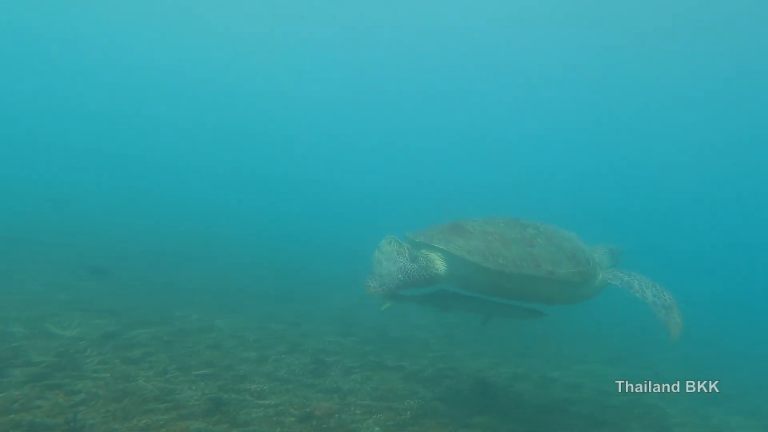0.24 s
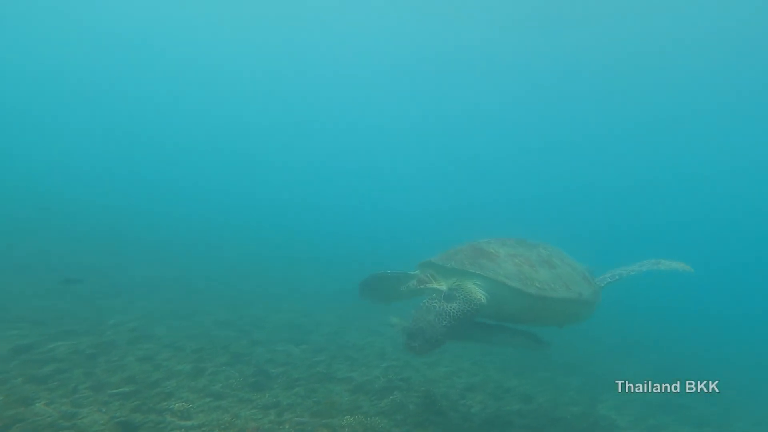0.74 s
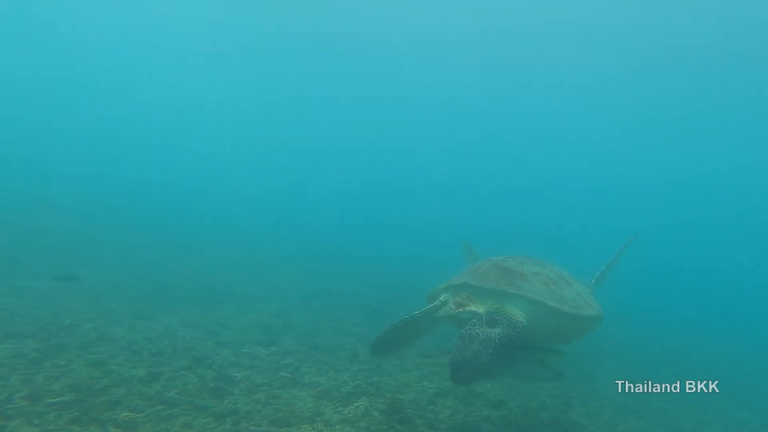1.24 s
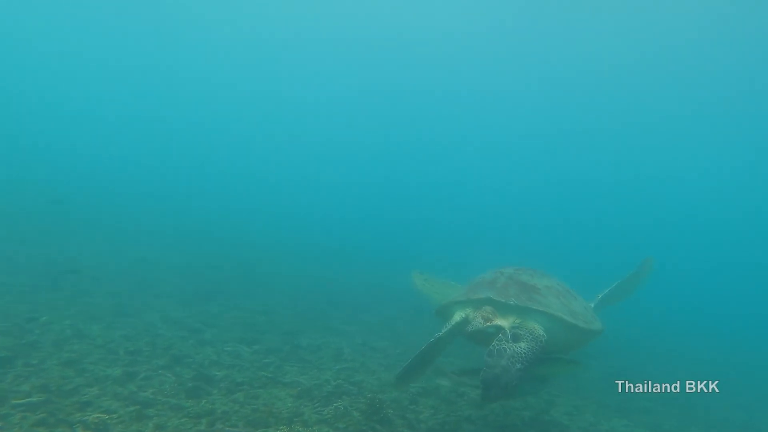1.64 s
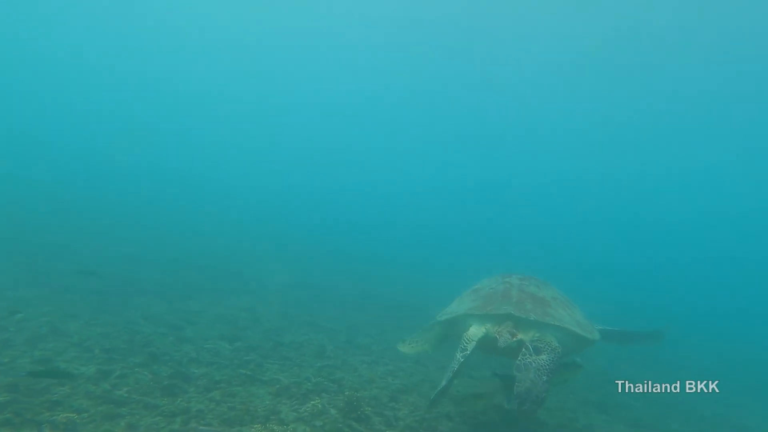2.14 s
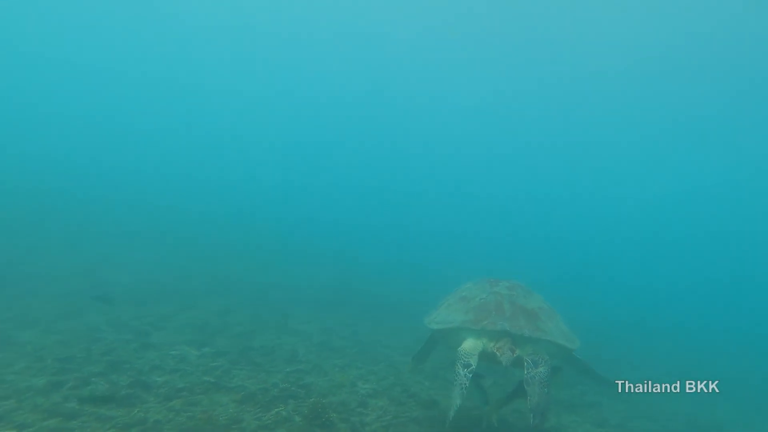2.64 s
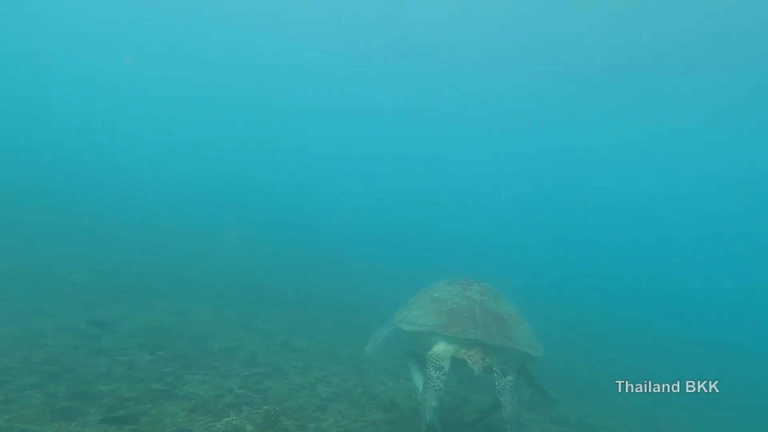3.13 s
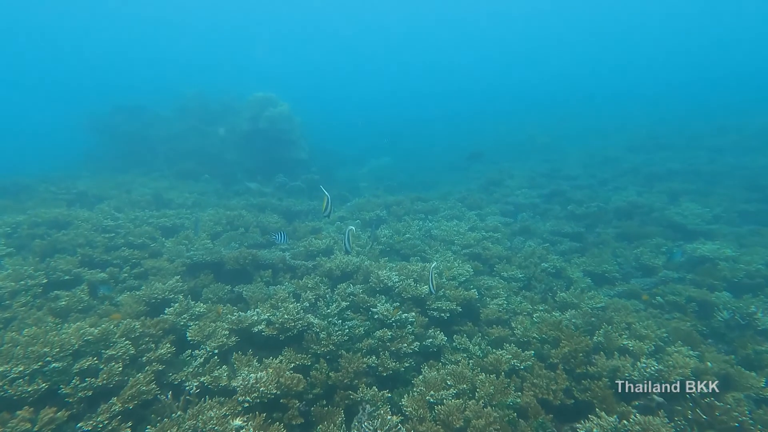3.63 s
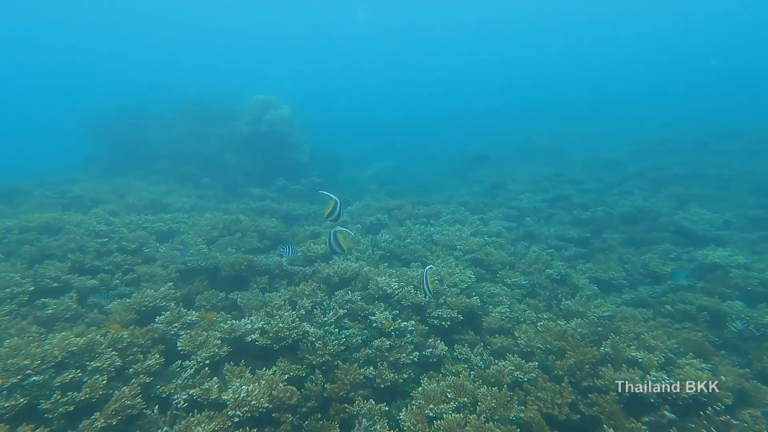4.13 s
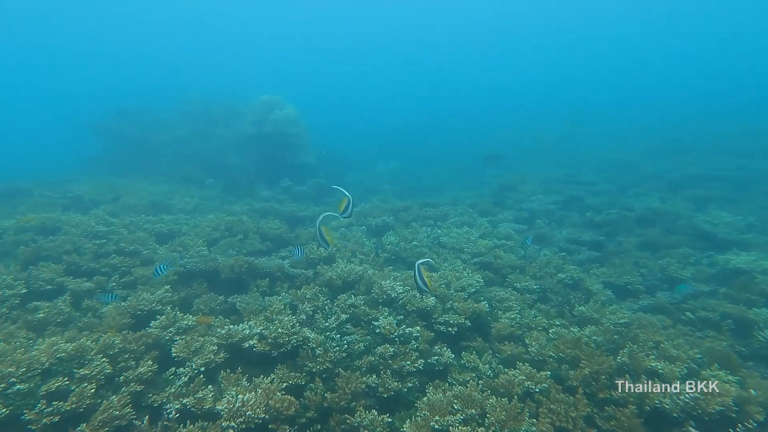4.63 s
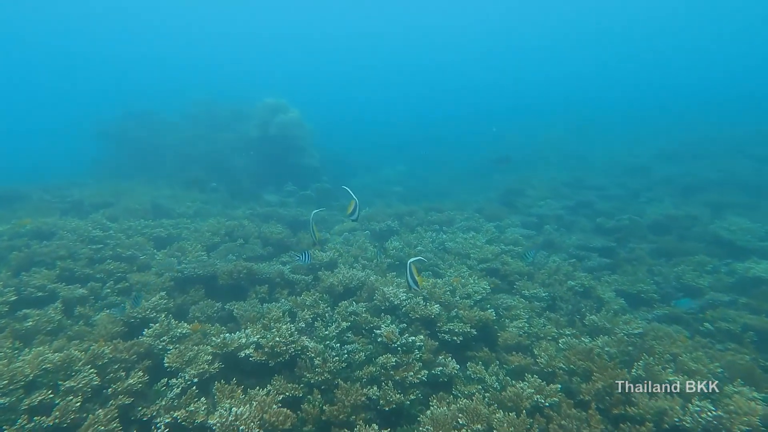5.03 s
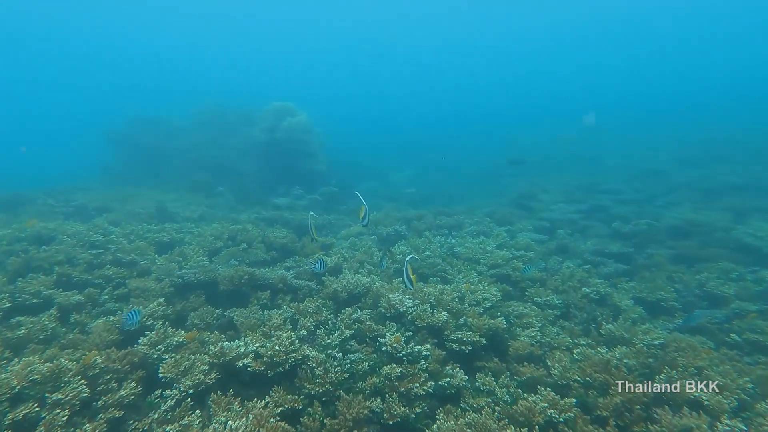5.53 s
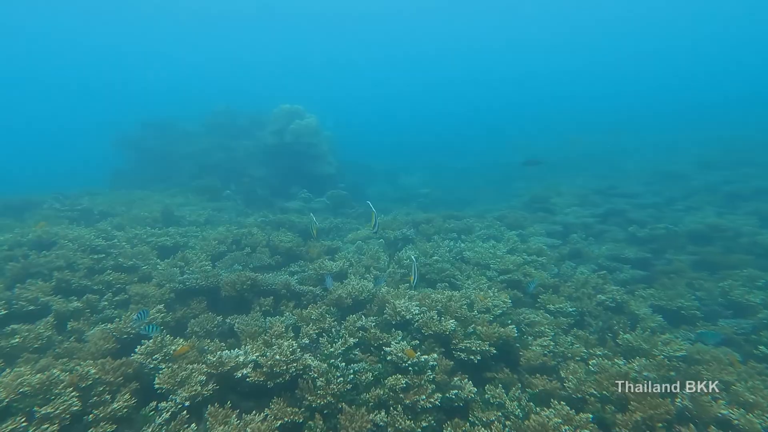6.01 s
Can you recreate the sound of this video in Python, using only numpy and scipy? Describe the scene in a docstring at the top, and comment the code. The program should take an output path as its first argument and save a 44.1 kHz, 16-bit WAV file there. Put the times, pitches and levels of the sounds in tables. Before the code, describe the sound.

A muffled, boomy underwater engine rumble with a slightly rising gear whine fills the first half, peppered by bright, dry shrimp snaps and a few low gurgles. The sound cuts off, leaving a short silence. Then comes a calmer reef: faint sizzling crackle and slow water rumble, with close hollow bonks, short rough creaks and one heavy thud near the end as the enclosed microphone is handled.

```python
"""Diesel boat, then a quiet reef

Two underwater scenes, heard through a watertight camera housing, with a short silence between them.
First a six-cylinder diesel throbs and whines over a bed of snapping shrimp; its rumble makes the housing drone.
Then a coral reef: shrimp crackle, nudges make the hand-held housing ring and knock, and the grip creaks.
Engine and water are filtered noise, whines and rings are sine tones, shrimp are clicks with short echoes;
water gurgles against the housing in both scenes, as short gliding tones."""
import sys
import numpy as np
from scipy import signal
from scipy.fft import rfft, irfft, next_fast_len
from scipy.io import wavfile
from scipy.ndimage import uniform_filter1d

SR = 44100
rng = np.random.default_rng(int(sys.argv[2]) if len(sys.argv) > 2 else 0)


def store_wav(level_fs):
    """Save 16-bit WAV to argv[1]."""
    pcm = np.round(np.clip(np.atleast_2d(level_fs), -1, 1) * 32767)
    wavfile.write(sys.argv[1], SR, pcm.T.astype(np.int16))


N = 276507
TIME = np.arange(N) / SR
BOAT_END_S, REEF_START_S = 3.286, 3.566
GEAR_TEETH, CYLINDERS = 16, 6
HOUSING_HZ, HOUSING_WIDTH_HZ = 351, 13  # the housing's lowest mode


def undb(db):
    """Decibels to gain."""
    return 10 ** (np.asarray(db) / 20)


def unit(x):
    """Scale to rms 1."""
    return x / np.sqrt(np.mean(x ** 2))


def curves(table):
    """The columns of a table, joined by straight lines in time."""
    s, *columns = np.transpose(table)
    return [np.interp(TIME, s, c) for c in columns]


def level(table):
    """The gain over time that a table of (time [s], level [dB]) describes."""
    return undb(curves(table)[0])


def walk(rate):
    """Random levels, each held 1 / rate s, then smoothed twice and scaled to rms near 1."""
    hold = int(SR / rate)
    steps = np.repeat(rng.standard_normal(N // hold + 1), hold)
    smooth = uniform_filter1d(uniform_filter1d(steps, hold), hold)
    return unit(smooth[:N])


def along(points, hz):
    """Read (Hz, value) points on a log-frequency axis."""
    f, v = np.transpose(points)
    return np.interp(np.log(hz + 1), np.log(f), v)


def colour(x, points, peaks=()):
    """Causal filter with a broad spectrum and narrow peaks or notches on it."""
    size = 8192
    hz = np.fft.rfftfreq(size, 1 / SR)
    db = along(points, hz) + sum(d / (1 + (2 * (hz - f) / w) ** 2) for f, w, d in peaks)
    # folding the cepstrum gives a minimum-phase filter: no sound before its cause
    cepstrum = irfft(np.log(undb(db)))[:size // 2]
    cepstrum[1:] *= 2
    response = irfft(np.exp(rfft(cepstrum, size)))[:size // 2]
    return signal.fftconvolve(x, response)[:len(x)]


def resonate(x, hz, width_hz):
    """One damped mode."""
    return signal.lfilter(*signal.iirpeak(hz, hz / width_hz, fs=SR), x)


def add(track, s, sound):
    """Mix a sound into a track from time s."""
    i = max(int(s * SR), 0)
    track[i:i + len(sound)] += sound[:N - i]


def crest(s, swell_s):
    """A bell-shaped rise and fall around time s."""
    return np.exp(-np.minimum(((TIME - s) / swell_s) ** 2, 100) / 2)


def chance_events(rate, t0, t1):
    """Events at random times between t0 and t1: rows of a time and three normal deviates."""
    times = t0 + np.cumsum(rng.gamma(2, .5, size=100)) / rate
    deviates = rng.standard_normal((len(times), 3))
    return [(s, *row) for s, row in zip(times, deviates) if s < t1]


# engine speed, as the pitch of the gear whine: (time [s], pitch [Hz])
GEAR_WHINE_PITCH = [(0, 254), (.3, 260), (.6, 262.5), (.9, 265.3), (1.2, 267), (1.5, 265.7), (1.9, 266.3),
                    (2.3, 267.7), (2.6, 271.7), (2.9, 276), (3.28, 278.3)]


def shaft_turns():
    """Turns of the crankshaft since the start; the gear whines once per tooth."""
    return np.cumsum(curves(GEAR_WHINE_PITCH)[0]) / GEAR_TEETH / SR


def firing_noise(throb):
    """Noise pumped by the firings; four-stroke, so each cylinder fires every other turn, with its own strength."""
    firings = shaft_turns() * CYLINDERS / 2
    cylinder_gain = undb(1.8 * rng.standard_normal(CYLINDERS))
    strength = cylinder_gain[firings.astype(int) % CYLINDERS]
    return strength * (1 + throb * np.cos(2 * np.pi * firings)) * rng.standard_normal(N)


# strength of the exhaust rumble, before lift_db is added: (time [s], level [dB])
RUMBLE_LEVEL = [(0.3, -25.5), (0.46, -26), (0.51, -27.5), (0.54, -23.5), (1.09, -32), (2.9, -24.5),
                (3.27, -25.5)]
# colour of the exhaust rumble: (frequency [Hz], relative level [dB])
RUMBLE_COLOUR = [(15, -9.5), (30, -7), (52, 4), (75, 1), (160, 1.5), (240, 3), (300, 10), (400, 6.5),
                 (470, -19.5), (650, -55), (6000, -100)]


def exhaust(lift_db=4.0):
    """The exhaust rumbles: throbbing noise, strongest near 300 Hz."""
    return unit(colour(firing_noise(throb=0.22), RUMBLE_COLOUR)) * level(RUMBLE_LEVEL) * undb(lift_db)


# tones of the drive, around which they wobble: (multiple of the shaft rate [1], level [dB])
DRIVE_TONES = [(3, -43.5), (5.5, -51), (6, -40.5), (7, -52), (9, -42), (11, -38.5), (12, -43.5),
               (16, -31.5), (30, -45), (48, -56), (64, -56), (66, -69.5)]
# the gear whine's second harmonic, around which it wobbles: (time [s], level [dB])
WHINE_LEVEL = [(0, -33.5), (.47, -31), (.6, -36.5), (2.5, -40), (2.9, -33.5), (3.27, -37)]


def drive_tones(wobble_db=0.5, jitter_turns=0.052):
    """Shaft and gears add tones locked to the shaft, unsteady in strength and phase."""
    turns = shaft_turns()
    tones = 0
    for order, db in DRIVE_TONES:
        cycles = order * turns + rng.random() + jitter_turns * walk(25.25)
        tones = tones + undb(db + wobble_db * walk(5.3)) * np.sin(2 * np.pi * cycles)
    whine_cycles = 2 * GEAR_TEETH * turns + jitter_turns * walk(25)
    whine = level(WHINE_LEVEL) * undb(wobble_db * walk(21.0)) * np.sin(2 * np.pi * whine_cycles)
    return tones + whine


# engine clatter: (time [s], level [dB])
CLATTER_LEVEL = [(.3, -40.5), (1.2, -37.5), (3.1, -36.5)]
# colour of the clatter: (frequency [Hz], relative level [dB])
CLATTER_COLOUR = [(300, -14), (450, -14), (520, -6), (580, -5), (660, -19.5), (780, -3.5), (1150, -6.5),
                  (1500, -0.5), (1720, -3.5), (2000, -23), (3000, -23.5), (5000, -20.5), (8000, -36.5),
                  (12000, -76)]
# peaks and notches of the housing's walls: (frequency [Hz], width [Hz], boost or cut [dB])
WALL_PEAKS = [(567.5, 29, 12), (828, 42, 5.5), (943, 90, -9), (1205, 150, 10.5), (1305, 98, -9),
              (2376, 130, -9), (2620, 70, 6), (2900, 400, -4.5), (3260, 160, 2.5), (3630, 150, 4)]


def surface_echo(x, share=0.5, lag_s=.009, sway_s=0.00032):
    """The sea surface returns the sound inverted; as the swell moves it, ripples drift through the spectrum."""
    return x - share * np.interp(TIME - lag_s - sway_s * walk(1.5), TIME, x)


def clatter():
    """The engine clatters: strongly throbbing noise, shaped by the walls and echoed by the surface."""
    direct = colour(firing_noise(throb=0.62), CLATTER_COLOUR, WALL_PEAKS)
    return unit(surface_echo(direct)) * level(CLATTER_LEVEL)


def hum(waver=0.02986, waver_rate=40, flutter_db=1.5):
    """The lowest mode driven hard by the boat: an almost pure tone whose pitch and strength waver."""
    pitch = HOUSING_HZ * (1 + waver * walk(waver_rate))
    tone = np.sin(2 * np.pi * np.cumsum(pitch) / SR)
    return unit(tone * undb(flutter_db * walk(waver_rate)))


def drone(push, skirt_hz=170, steady_s=0.13):
    """The housing's lowest mode, kept ringing at an even strength by a random push."""
    ring = resonate(resonate(push, HOUSING_HZ, HOUSING_WIDTH_HZ), HOUSING_HZ, skirt_hz)
    return ring / np.sqrt(uniform_filter1d(ring ** 2, int(steady_s * SR)) + 1e-12)


# the drone between its surges, before pure_db or rough_db is added: (time [s], level [dB])
DRONE_LEVEL = [(0.0, -24), (0.4, -24.5), (1.1, -22.5), (1.6, -26), (2.3, -24.5), (3.27, -27)]
# surges of the drone, before surge_db is added: (time of the crest [s], peak level [dB], swell time [s])
DRONE_SURGES = [(.215, -12.5, 0.013), (.309, -14.5, 0.033), (.409, -17, .02), (.528, -13.5, 0.016),
                (.616, -11.5, 0.012), (0.706, -18.5, 0.027), (0.793, -13.5, .021), (0.9, -21, 0.025),
                (.975, -17.5, 0.035), (1.065, -11.5, 0.03), (1.136, -12.5, 0.0088), (1.247, -19.5, 0.017),
                (1.371, -15, 0.027), (1.439, -12.5, .012), (1.5, -18, 0.016), (1.561, -17, .021),
                (1.679, -12, 0.0098), (1.758, -18.5, .022), (1.845, -14, 0.021), (2.003, -15, 0.03),
                (2.093, -16, 0.016), (2.169, -19, .016), (2.336, -12.5, 0.013), (2.485, -16, 0.013),
                (2.679, -18, 0.016)]


def boat_drone(surge_db=1.0, pure_db=-4, rough_db=-3, upper_db=-40):
    """Two modes of the housing drone along with the boat, the lower one in surges."""
    surges = sum(undb(db + surge_db) * crest(s, swell_s) for s, db, swell_s in DRONE_SURGES)
    surges = surges / np.sqrt(2)  # peak to rms
    steady = level(DRONE_LEVEL)
    pure = hum() * np.hypot(steady * undb(pure_db), surges)
    rough = drone(firing_noise(throb=0.24)) * steady * undb(rough_db)
    upper = firing_noise(throb=0.15)
    for _ in range(3):
        upper = resonate(upper, 538.5, 54.5)  # pitch and width of the second mode, Hz
    return pure + rough + unit(upper) * undb(upper_db)


def even_out(x, size=19):
    """Level the chance peaks of a short burst's spectrum, so that it cracks instead of pinging."""
    spectrum = rfft(x)
    even = irfft(spectrum / np.sqrt(uniform_filter1d(np.abs(spectrum) ** 2, size)))
    return even * np.linspace(1, 0, len(x))


def snaps(rows, points, peaks, gather, scatter_db, gain_db, wall_share,
          late_db=-26, split_hz=3500, pitch_width=0.17):
    """A claw's bubble collapses: a spike with a pitch, then bottom echoes that gather and soon die."""
    out, t = np.zeros(N), TIME[:2048]
    lows = signal.butter(4, split_hz, fs=SR, output="sos")
    highs = signal.butter(2, split_hz, "high", fs=SR, output="sos")
    peaks = [(hz, width, wall_share * db) for hz, width, db in peaks]
    noises = rng.standard_normal(size=(160, len(t)))
    for (s, db, treble_db, tail_s, pitch_hz, pitch_db), noise in zip(rows, noises):
        gathering = 1 - np.exp(-t / (gather * tail_s))
        burst = undb(scatter_db) * noise * gathering * np.exp(-t / tail_s)
        burst += undb(scatter_db + late_db) * noise[::-1] * np.exp(-t / (4 * tail_s))
        burst[0] += 1  # the spike itself
        own_pitch = (pitch_hz, pitch_width * pitch_hz, pitch_db)
        burst = colour(even_out(burst), points, peaks + [own_pitch])
        treble = unit(signal.sosfilt(highs, burst))
        snap = unit(signal.sosfilt(lows, burst)) - undb(treble_db) * treble
        loudest = np.sqrt(uniform_filter1d(snap ** 2, size=132).max())  # rms over 3 ms
        add(out, s, snap * undb(db + gain_db) / loudest)
    return out


# the nearest shrimp of both scenes; each scene's gain_db is added to the level:
# (time [s], level of the loudest 3 ms [dB], treble relative to the rest [dB],
#  decay time of the echoes [s], pitch of the snap [Hz], strength of that pitch [dB])
NEAR_SNAPS = [(0.1496, -35, 17, 0.0057, 4760, 9), (0.2172, -25, -6, 0.00081, 1590, 4),
              (0.2654, -16.5, -10, 0.0013, 1640, 4.5), (0.3904, -28, -6.5, 0.0012, 1420, 3),
              (0.5396, -30, 3.5, 0.00084, 4780, 10), (0.604, -31, -5.5, 0.001, 1450, 5),
              (0.6863, -29, -17, 0.0013, 1440, 9.5), (0.883, -39.5, 6, 0.0012, 4780, 10),
              (0.9746, -33, -10, 0.0016, 1550, 3), (1.0348, -39, 10, 0.0025, 4520, 14),
              (1.2055, -28, -23, 0.0022, 1340, 14), (1.2162, -30, -4, 0.0007, 1590, 8),
              (1.2593, -33, -12, 0.0023, 1610, 8), (1.3, -34, 9, 0.00073, 4350, 1),
              (1.4597, -33.5, 17, 0.0015, 4610, 9), (1.5583, -35, -18, 0.0034, 1440, 11),
              (1.5783, -35, -10, 0.0041, 1440, 4), (1.6415, -17.5, -12, 0.0014, 1680, -1),
              (1.6729, -24, -0.5, 0.0016, 3600, 9), (1.7053, -34, -3, 0.001, 1210, 2),
              (1.7816, -32, -4, 0.0015, 3340, 7), (1.859, -27, -11, 0.0012, 1610, 5),
              (1.9607, -27.5, 10, 0.0022, 4660, 8), (1.9755, -31.5, 10, 0.0011, 5020, 11),
              (2.178, -33.5, -2, 0.0023, 4930, 2), (2.2412, -31, -6, 0.0013, 1570, -1),
              (2.3874, -24, -8, 0.00068, 1210, -2), (2.4207, -27, -1, 0.0011, 1560, 6),
              (2.4548, -27, -1, 0.003, 4660, 6), (2.4706, -28.5, -14, 0.00073, 1550, 2),
              (2.4889, -32, -4, 0.0015, 1570, 6), (2.517, -17.5, -7.5, 0.002, 1650, -2),
              (2.5457, -26, -21, 0.0015, 1570, 8), (2.6804, -34.5, -15, 0.0021, 1590, 2),
              (2.7403, -28.5, 12, 0.001, 4660, 9), (2.8684, -28.5, -11, 0.0012, 1550, 13),
              (2.968, -30, -16, 0.00076, 1600, 13), (3.0092, -27, -13, 0.0011, 1600, 7),
              (3.0465, -20, 10, 0.00098, 4670, 7), (3.0948, -31.5, 7, 0.0022, 4520, 5),
              (3.1318, -21.5, -18, 0.0013, 1570, 13.5), (3.1972, -27, 21, 0.00079, 5000, 7),
              (3.272, -28, -7.5, 0.00071, 1565, 6.5), (3.8188, -44.5, -10, 0.0084, 2580, 9),
              (3.8323, -31, 4, 0.0021, 3600, 13), (3.852, -39, -17, 0.0052, 1370, 10),
              (4.001, -42, -4, 0.0037, 1440, 7), (4.0099, -44, -17, 0.005, 2090, 18),
              (4.112, -37.5, -9, 0.0044, 2170, 6), (4.131, -44.5, 3, 0.0066, 3380, 6),
              (4.1512, -44, 3, 0.0041, 3230, 4), (4.2264, -39, 0, 0.002, 3180, 1),
              (4.3486, -42.5, -14, 0.0034, 1490, 4), (4.36, -45.5, -1, 0.0028, 3340, 7),
              (4.571, -43.5, -11, 0.004, 1748, 6), (4.6156, -43, 13, 0.0013, 4410, 10),
              (4.7229, -43, -5, 0.0022, 1510, 2), (4.864, -36.5, 1, 0.0035, 4070, 6),
              (4.9984, -36, -8, 0.0046, 1440, 7), (5.043, -44, 11, 0.002, 4310, 4),
              (5.237, -38, -1, 0.0025, 3290, 3), (5.3119, -38.5, -18, 0.0018, 1460, 11),
              (5.345, -42, 3, 0.003, 3250, 8), (5.409, -38, -18, 0.002, 1420, 0),
              (5.4717, -48, -14, 0.0063, 1460, 17), (5.575, -43, 7, 0.0015, 4220, -1),
              (5.6032, -39.5, 14, 0.0012, 3420, 7), (5.664, -42, -2, 0.0035, 3200, 8),
              (5.702, -46, -9, 0.006, 2520, 20), (5.718, -33, -1, 0.0036, 3960, 13),
              (5.83, -37, 5, 0.0023, 4330, 13), (5.8684, -42, -16, 0.0024, 1490, 5),
              (5.9015, -42, -8, 0.007, 2480, -5), (5.9122, -33.5, 4, 0.0018, 3300, 3),
              (5.916, -33, -21, 0.0022, 1260, 15), (6.0307, -43.5, -3, 0.0049, 3250, 2),
              (6.0413, -38.5, -12, 0.0018, 1400, 11), (6.121, -45, -4, 0.004, 3266, 8),
              (6.138, -40, 4, 0.0021, 3270, -2), (6.181, -42.5, 0, 0.0034, 3250, 3),
              (6.206, -43, -9, 0.0012, 1420, 7)]


def shrimp(rate, db, treble_db, t0, t1):
    """The listed snaps between t0 and t1, joined by random ones (snaps per s, mean level, mean treble)."""
    others = []
    for s, a, b, c in chance_events(rate, t0, t1):
        pitch_hz = 2600 * 2 ** (.6 * c)
        # spreads of 2 and 8.5 dB; echoes decay in 1.4 ms; the pitch stands out by 9 dB
        others.append((s, db + 2 * a, treble_db + 8.5 * b, 0.0014, pitch_hz, 9))
    return [row for row in NEAR_SNAPS if t0 < row[0] < t1] + others


# centres of the bands in which each far click has its own strength: (frequency [Hz])
CRACKLE_BANDS = [1200, 1900, 3000, 4700, 7500]


def crackle(points, peaks, rate, spread_db, tail_s, scatter_db, hiss_db, variety_db=5):
    """Countless far shrimp: varied clicks, smeared by the sea bed; the farthest merge into a hiss."""
    sizes = undb(spread_db * np.minimum(rng.exponential(size=N), 3.5))
    clicks = (rng.random(N) < rate / SR) * sizes
    size = next_fast_len(N)
    hz, arrivals = np.fft.rfftfreq(size, 1 / SR), 0
    for band in np.eye(len(CRACKLE_BANDS)):
        direct = clicks * rng.choice([-1, 1], N) * undb(variety_db * rng.uniform(-2.9, 3.2, N))
        # the echoes' energy dies away, and noise carries it
        echoes = signal.lfilter([1], [1, -np.exp(-2 / (tail_s * SR))], direct ** 2)
        scatter = np.sqrt(signal.lfilter(np.hanning(64) / 32, 1, echoes)) * rng.standard_normal(N)
        share = np.sin(np.pi / 2 * along(list(zip(CRACKLE_BANDS, band)), hz))
        arrivals = arrivals + share * rfft(direct + undb(scatter_db) * scatter, size)
    hiss = undb(hiss_db) * rng.standard_normal(N)
    return unit(colour(unit(irfft(arrivals, size)[:N]) + hiss, points, peaks))


# colour of a near snap on the sea bed: (frequency [Hz], relative level [dB])
BED_SNAP_COLOUR = [(500, -26), (1100, -3), (1550, 4), (2100, 2), (2700, -4), (3300, -3.5), (4100, -4),
                   (4700, 1), (5600, -3), (7000, -9), (8400, -25), (9500, -28), (11000, -36), (12500, -41),
                   (15000, -62)]
# colour of the far crackle of the sea bed: (frequency [Hz], relative level [dB])
BED_COLOUR = [(500, -29.5), (1200, 5.5), (1700, -5), (2500, 3), (4100, -8.5), (4700, 9), (5500, -6.5),
              (6800, -12.5), (7600, -18.5), (8400, -29), (9300, -22.5), (11000, -37.5), (13500, -71.5)]


def bed_shrimp():
    """The busy sea bed under the boat: near snaps over a far crackle."""
    rows = shrimp(rate=22, db=-37.5, treble_db=-1, t0=0, t1=BOAT_END_S)
    near = snaps(rows, BED_SNAP_COLOUR, WALL_PEAKS, gather=1, scatter_db=5, gain_db=.5, wall_share=.7)
    far = crackle(BED_COLOUR, WALL_PEAKS, rate=350, spread_db=0.0, tail_s=0.0038,
                  scatter_db=-2, hiss_db=-1.5)
    return near + far * undb(-41.5)


# colour of the crackle that arrives from all round: (frequency [Hz], relative level [dB])
DIFFUSE_COLOUR = [(450, -25), (850, 0), (1300, -3), (2000, 0), (3000, -6), (5000, -13), (7000, -20),
                  (10000, -34), (14000, -60)]


def crackle_all_round():
    """Crackle from all round; opposite signs in the two ears make it sound wide."""
    diffuse = crackle(DIFFUSE_COLOUR, WALL_PEAKS, rate=900, spread_db=3, tail_s=.002,
                      scatter_db=-6, hiss_db=-6) * undb(-46.5)
    return np.array([diffuse, -diffuse])


# the reef's crackle at its start, a quick peak, a drop and a rise: (time [s], level [dB])
REEF_OPENING = [(3.585, -20), (3.595, 0), (3.61, -9), (3.66, -9), (3.7, -4.5), (3.82, 0)]
# colour of the reef's crackle: (frequency [Hz], relative level [dB])
REEF_COLOUR = [(400, -3.5), (700, 7.5), (1000, -13), (1400, 5), (2200, -4), (3300, 0.5), (4300, -2),
               (6000, -10), (8000, -13), (9600, -20), (11500, -33.5), (15000, -46.5)]
# peaks and notches of the sound over the reef: (frequency [Hz], width [Hz], boost or cut [dB])
REEF_RESONANCES = [(780, 89, -14), (1090, 59, -4.5), (1195, 88, 7.5), (1300, 61, -19), (1320, 120, 6),
                   (2090, 120, -3.5), (2164, 210, 10), (2546, 65, 7), (2894, 180, -8), (3260, 120, 4),
                   (3690, 220, -8.5), (3940, 300, 2)]


def reef_shrimp(lift_s=.06, lift_db=-11):
    """Near snaps and far crackle, which grows louder for a moment around each near snap."""
    rows = shrimp(rate=10, db=-51, treble_db=-1, t0=REEF_START_S, t1=TIME[-1])
    near = snaps(rows, REEF_COLOUR, REEF_RESONANCES, gather=1.1, scatter_db=10, gain_db=-.5, wall_share=1)
    lift = np.sqrt(np.abs(uniform_filter1d(near ** 2, int(lift_s * SR)))) * undb(lift_db)
    far = crackle(REEF_COLOUR, REEF_RESONANCES, rate=320, spread_db=4.0, tail_s=0.0031,
                  scatter_db=-7.0, hiss_db=-4.0)
    return (near + far * np.hypot(undb(-51.5), lift)) * level(REEF_OPENING)


def swells(rows, waver, linger):
    """Short gliding tones that swell to a crest and ring out; `waver` is the unsteadiness of their pitch."""
    out, drift = np.zeros(N), walk(170)
    for (s, db, hz, swell_s, glide), turn in zip(rows, rng.random(size=200)):
        u = np.arange(-4, 10, 1 / (swell_s * SR))  # time from the crest, in swell times
        shape = np.where(u < 0, np.exp(-u ** 2 / 2), 1 / np.cosh(u / linger))
        unsteady = 1 + waver * np.roll(drift, -int(s * SR))[:len(u)]
        pitch = hz * 2 ** (glide * u * swell_s) * unsteady
        tone = np.sin(2 * np.pi * (np.cumsum(pitch) / SR + turn))
        add(out, s - 4 * swell_s, undb(db) * shape * tone)
    return out


# nudges that ring the housing: (time of the crest [s], peak level [dB], pitch [Hz], swell time [s])
HAND_NUDGES = [(3.632, -12, 346.5, .012), (3.702, -16, 320, .006), (3.829, -19.5, 341, .009),
               (3.875, -11, 327.5, .006), (4.005, -13, 330, .003), (4.019, -14, 324, .004),
               (4.065, -12.5, 303, .0055), (4.139, -15.5, 284, 0.0051), (4.381, -9.5, 320, .007),
               (4.475, -17, 314, .005), (4.585, -13, 317.5, .0093), (4.648, -20.5, 336, .0097),
               (4.713, -13, 340, .0147), (4.942, -24, 341.5, .015), (5.035, -27.5, 340, .008),
               (5.171, -24, 358.7, .008), (5.245, -21, 358.6, .006), (5.46, -30, 353, .012),
               (5.586, -30, 360, 0.0098), (5.735, -25.5, 345, 0.0075), (5.818, -12.5, 366, .011),
               (6.101, -20, 349, .005), (6.149, -15.5, 348, .006), (6.212, -23.5, 366, .004)]


def nudges(rebound_s=0.026, rebound_db=-6, glide=-0.27):
    """Each nudge rings the housing, sagging in pitch, and it rocks back twice, weaker; the hand trembles too."""
    rebounds = [(s + k * rebound_s, db + k * rebound_db, hz, .0065)
                for s, db, hz, _ in HAND_NUDGES for k in (1, 2)]
    # tremors at random: 6.5 per s, about -34.5 dB and 336.5 Hz, swelling in 9 ms
    tremors = [(s, -34.5 + 2 * a, 336.5 * (1 + 0.059 * b), .009)
               for s, a, b, _ in chance_events(6.5, REEF_START_S, TIME[-1])]
    rows = [(*row, glide) for row in HAND_NUDGES + rebounds + tremors]  # glide in octaves per s
    return swells(rows, waver=0.029, linger=0.95)


# dull knocks on the housing: (time of the start [s], peak level [dB], pitch [Hz], swell time [s])
HOUSING_KNOCKS = [(3.998, -17, 510, 0.0023), (4.042, -22.5, 500, 0.0021), (4.057, -22, 440, 0.0054),
                  (4.2747, -18, 274, 0.0035), (5.096, -27.5, 630, 0.0018), (5.0967, -15.5, 356, 0.0044),
                  (5.379, -16, 132, 0.0055), (5.409, -31, 606, 0.0038), (6.068, -22, 483, 0.0023),
                  (6.0701, -5, 313, 0.0043), (6.08, -17, 343, 0.012), (6.204, -33, 600, 0.0014)]


def knocks(softness=2.73):
    """Sudden thuds that the water damps within a few cycles; `softness` is how gently they set in."""
    out, t = np.zeros(N), TIME[:4096]
    for s, db, hz, swell_s in HOUSING_KNOCKS:
        shape = (t / swell_s * np.exp(1 - t / swell_s)) ** softness
        add(out, s, undb(db) * shape * np.sin(2 * np.pi * hz * t))
    return out


# creaks of the grip: (time of the crest [s], rms level [dB], pitch [Hz], width [Hz], swell time [s])
GRIP_CREAKS = [(3.86, -47, 750, 160, .012), (3.972, -43.5, 493, 90, 0.015), (4.015, -39, 620, 220, 0.014),
               (4.066, -41, 710, 110, 0.0086), (4.092, -39.5, 556, 130, 0.01),
               (4.122, -42.5, 660, 190, 0.013), (4.205, -46, 580, 110, .009), (4.374, -57, 720, 260, .009),
               (4.448, -54, 600, 220, 0.0059), (4.574, -47.5, 670, 230, 0.0092),
               (4.634, -49, 720, 80, 0.011), (4.686, -43.5, 590, 150, .006), (4.706, -49, 720, 30, .014),
               (4.704, -44, 834, 25, 0.012), (5.85, -47, 510, 120, .018), (5.895, -44, 555, 120, 0.011)]


def creaks():
    """The grip slips on the housing in short, rough bursts of narrow-band noise."""
    out, rub = np.zeros(N), rng.standard_normal(N)
    for s, db, hz, width_hz, swell_s in GRIP_CREAKS:
        span = slice(int((s - .2) * SR), int((s + .2) * SR))
        edges = [hz - width_hz / 2, hz + width_hz / 2]
        band = signal.butter(3, edges, "band", fs=SR, output="sos")
        shape = crest(s, swell_s)[span]
        burst = shape * signal.sosfilt(band, rub[span])
        out[span] += undb(db) * burst * np.linalg.norm(shape) / np.linalg.norm(burst)
    return out


# gurgles of water on the housing:
# (time of the crest [s], peak level [dB], pitch [Hz], swell time [s], glide [octaves per s])
WATER_GURGLES = [(.08, -13.5, 138, .02, -1), (.16, -14.5, 114, 0.013, 5.5), (.225, -14.5, 147.7, .012, 0.5),
                 (.275, -18.5, 155.5, 0.021, 1.5), (.51, -14.5, 202, 0.0089, -2),
                 (.605, -21.5, 200, 0.0089, -1.5), (2.17, -20.5, 60.8, .014, -5.5),
                 (2.31, -14, 286, .012, 2), (2.605, -20.5, 187, 0.015, 1), (3.25, -25.5, 36.5, 0.022, -1.5),
                 (5.065, -33, 230, 0.0097, -8), (5.12, -33.5, 98, .01, -8), (5.245, -31, 79, 0.011, 6),
                 (5.54, -29, 113, 0.0088, -7.5), (5.59, -29, 84.6, 0.024, -4.5),
                 (5.675, -35, 128, .012, 15), (5.705, -34, 246, .014, 2), (5.725, -29.5, 152, 0.014, -1.5),
                 (5.80, -37, 139, 0.034, 1.5), (6.09, -21.5, 132, 0.0076, -13),
                 (6.112, -25, 62, 0.0075, -4), (6.145, -26, 210, 0.0078, -1)]


def gurgles():
    """Water gurgles against the housing: low, brief tones that glide up or down."""
    return swells(WATER_GURGLES, waver=.03, linger=0.6)


# slow water over the reef: (time [s], level [dB])
WATER_LEVEL = [(3.8, -35.5), (4.18, -35.5), (4.84, -42.5), (5.1, -37), (6.2, -34.5)]
# colour of the slow water: (frequency [Hz], relative level [dB])
WATER_COLOUR = [(15, -2), (28, 1), (45, 2.5), (75, -9), (130, -15.5), (230, -13), (400, -17), (500, -28),
                (650, -24.5), (850, -62), (1500, -57), (8000, -100)]


def slow_water():
    """Slow water over the reef: low, soft noise."""
    return unit(colour(rng.standard_normal(N), WATER_COLOUR)) * level(WATER_LEVEL)


def two_ports(x):
    """The housing's walls bring the sound to its two microphones with unequal level and phase."""
    # (frequency [Hz], left minus right [dB])
    balance_db = [(150, 0.3), (300, 0.9), (510, 3.0), (870, -2.5), (1490, 2.0), (2540, -4.0),
                  (4340, -4.0), (7400, 1.9)]
    # (frequency [Hz], lead of the left over the right [radians])
    lead = [(170, 0), (350, 0.11), (530, .5), (800, -1.4), (1290, 1.0), (1890, -1.1), (2330, -.9),
            (2580, 1.0), (3270, -0.8), (3880, .6), (4300, -0.1), (6700, 0.12), (7600, -0.97)]
    size = next_fast_len(N)
    hz, spectrum = np.fft.rfftfreq(size, 1 / SR), rfft(x, size)
    half = undb(along(balance_db, hz) / 2) * np.exp(.5j * along(lead, hz))
    return np.array([irfft(spectrum * half, size), irfft(spectrum / half, size)])[:, :N]


def boat_scene():
    """The boat over a busy bed of shrimp; part of the crackle comes from all round."""
    boat = exhaust() + drive_tones() + clatter() + boat_drone()
    return two_ports(boat + bed_shrimp()) + crackle_all_round()


def reef_scene():
    """Shrimp and slow water, with the housing ringing at every nudge; the same in both ears."""
    housing = drone(rng.standard_normal(N)) * undb(-36.5)
    handling = nudges() + knocks() + creaks()
    return reef_shrimp() + handling + housing + slow_water()


def scene(fade_out_s=0.0008, fade_in_s=0.032):
    """The boat scene stops short; after a silence the reef fades in."""
    first = np.clip((BOAT_END_S - TIME) / fade_out_s, 0, 1)
    second = np.clip((TIME - REEF_START_S) / fade_in_s, 0, 1)
    water = gurgles()
    return first * (boat_scene() + water) + second * (reef_scene() + water)


def record(dry, top_hz=15100):
    """The camera cuts the treble steeply above top_hz."""
    return signal.sosfilt(signal.ellip(8, .2, 70, top_hz, fs=SR, output="sos"), dry)


dry = scene()
out = record(dry)
store_wav(out)
```